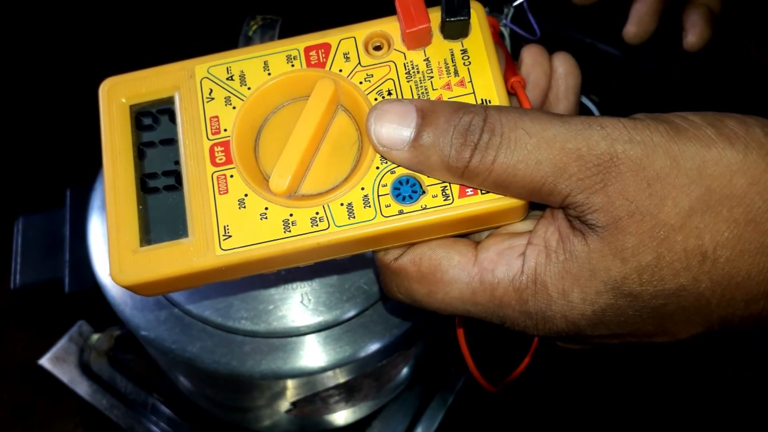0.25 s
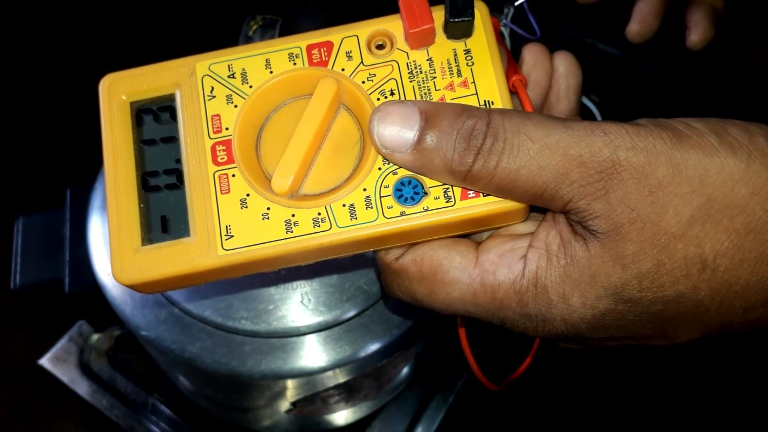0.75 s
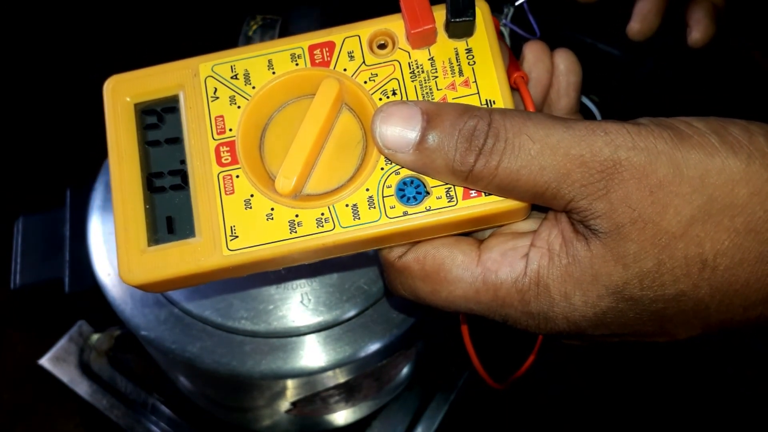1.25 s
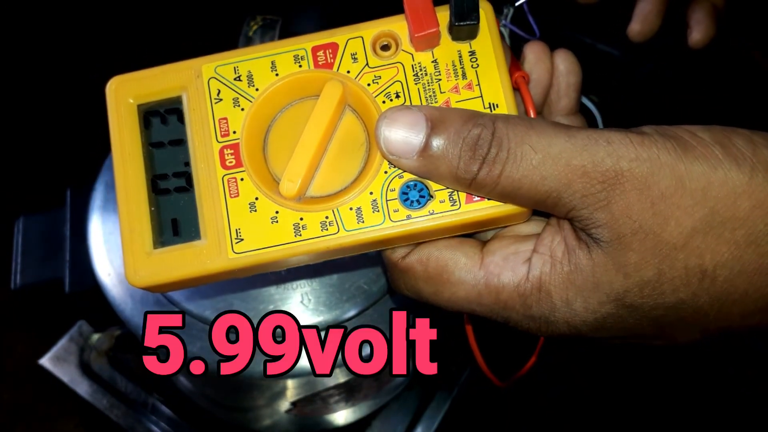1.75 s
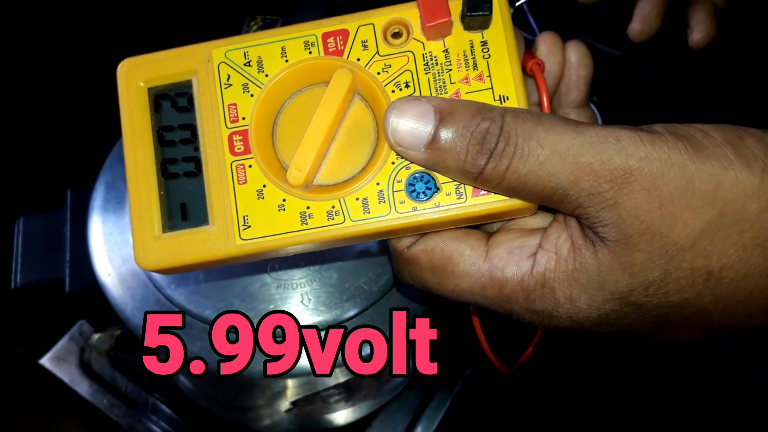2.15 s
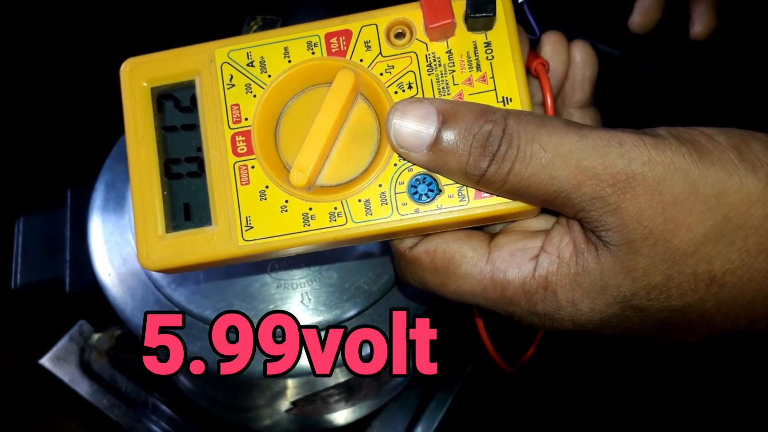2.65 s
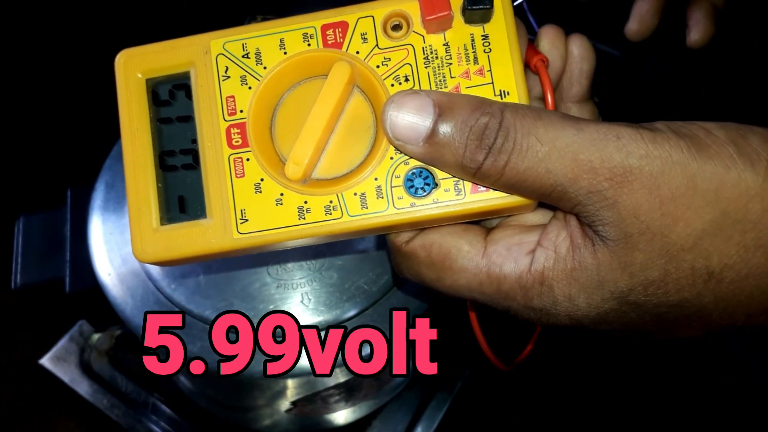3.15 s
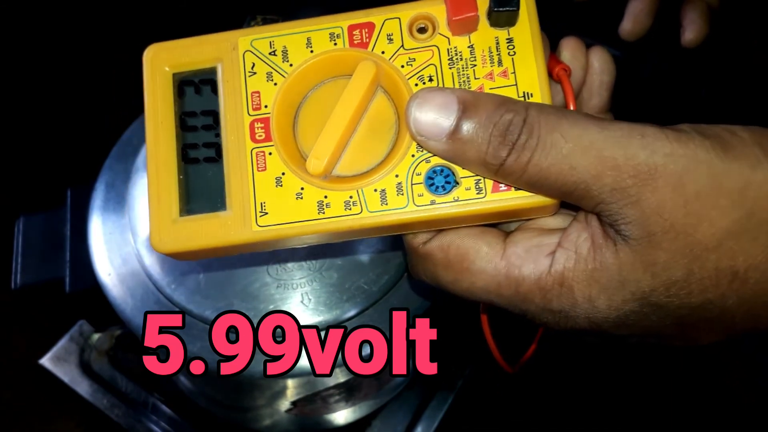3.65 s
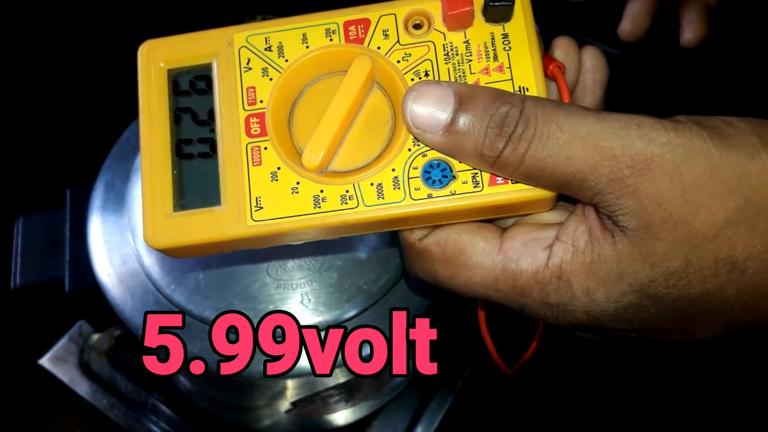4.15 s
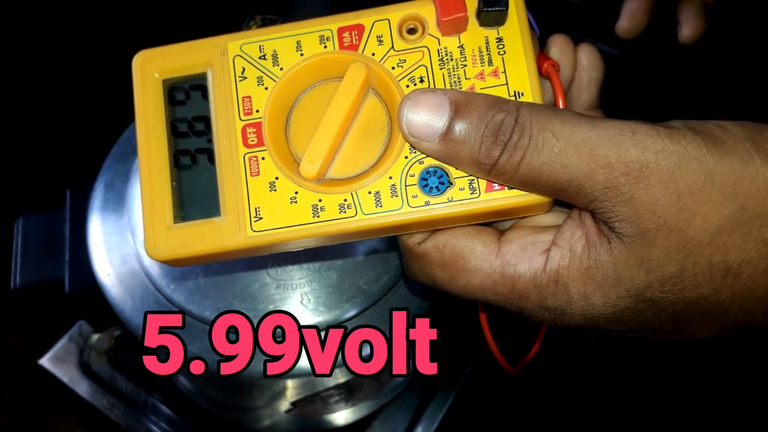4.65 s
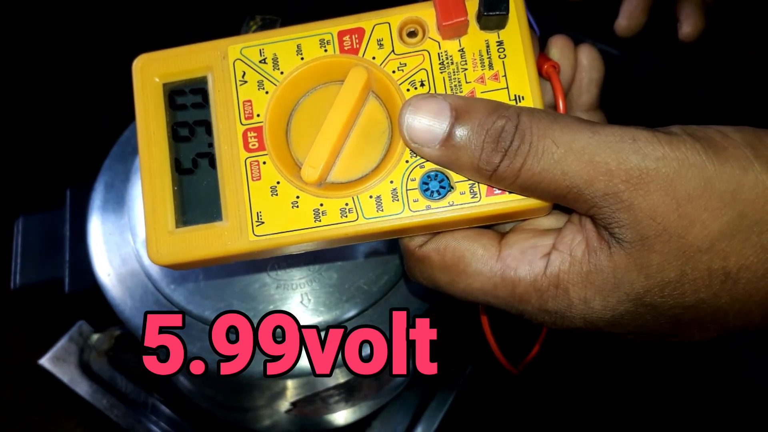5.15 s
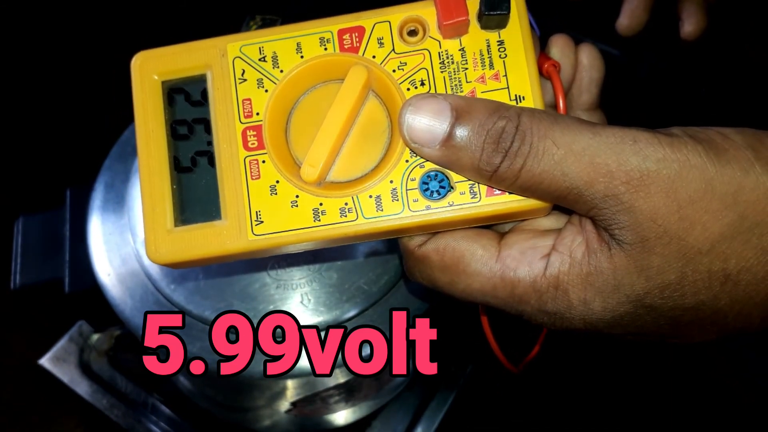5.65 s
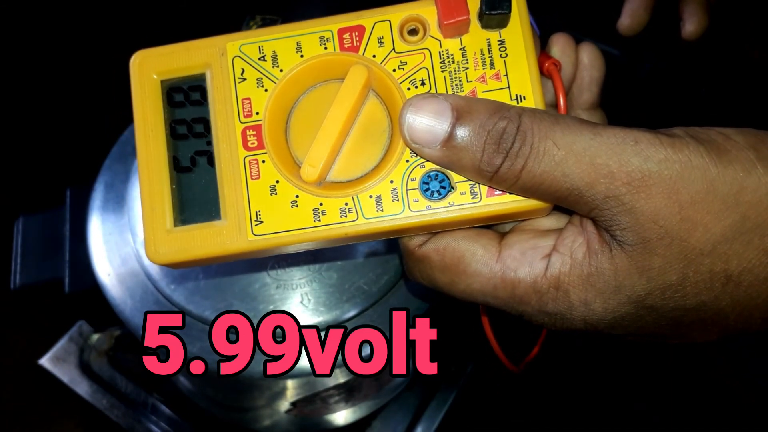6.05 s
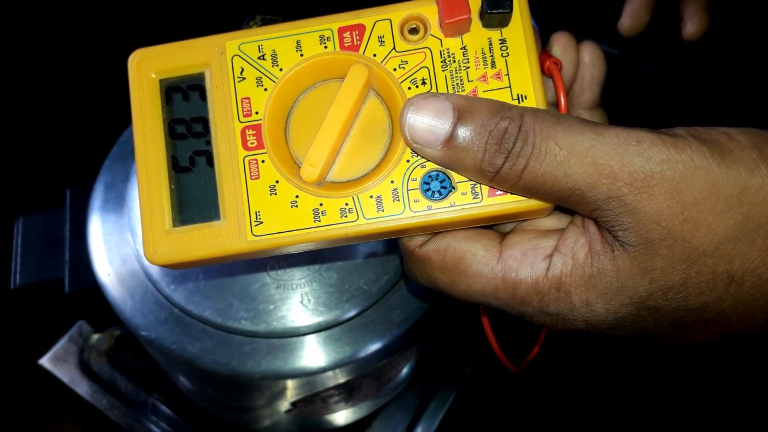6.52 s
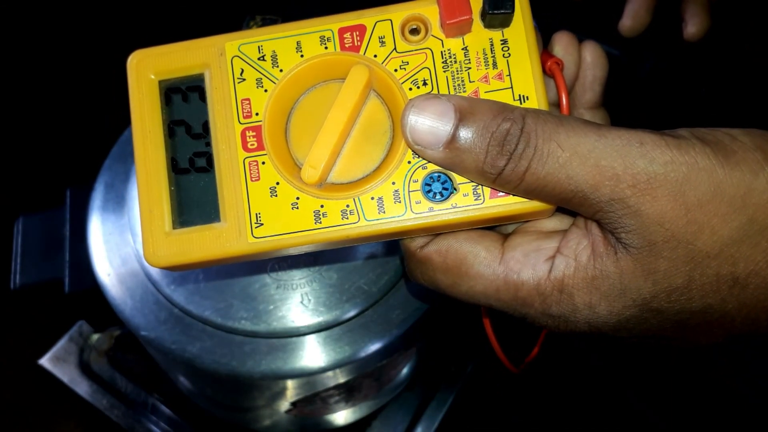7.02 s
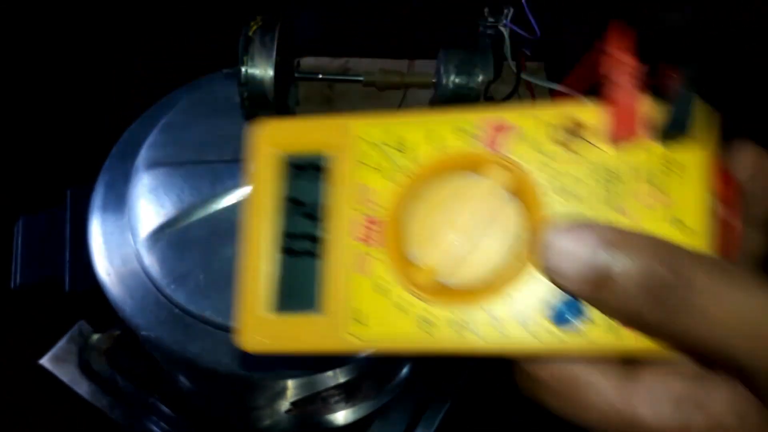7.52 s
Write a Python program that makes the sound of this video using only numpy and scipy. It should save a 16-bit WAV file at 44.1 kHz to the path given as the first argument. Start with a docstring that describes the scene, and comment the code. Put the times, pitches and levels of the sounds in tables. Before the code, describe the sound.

A small homemade steam engine runs steadily, with a wet, pulsing hiss over a fast metallic rattle and a faint hum.

```python
"""A wet, pulsing hiss over a rattle and a faint hum: a small homemade steam engine spins a little
generator, about 44 turns a second, on the lid of a pressure cooker. Steam leaves the valve in one puff
per turn, the loose crank and rod knock, and the shaft hums on its harmonics. Now and then a larger drop
spits. Hiss, rattle and spits ring through the wooden base, the metal parts and the valve cavity."""
import sys
import numpy as np
from scipy import signal
from scipy.fft import rfft, irfft
from scipy.io import wavfile

SR = 44100
rng = np.random.default_rng(int(sys.argv[2]) if len(sys.argv) > 2 else 0)


def to_wav(s):
    """Save 16-bit WAV."""
    ch = np.atleast_2d(s).T  # columns
    pcm = np.round(np.clip(ch, -1, 1) * 32767)  # PCM
    wavfile.write(sys.argv[1], SR, pcm.astype(np.int16))


N = 343092

# shaft speed: t/s, speed/(turns per s)
SHAFT_SPEED = [(0.0, 44.16), (0.9, 44.76), (1.42, 43.88), (1.63, 43.75), (2.2, 45.35), (2.35, 45.15),
               (2.74, 43.82), (3.05, 43.42), (3.56, 44.15), (4.1, 44.25), (4.43, 43.86), (5.55, 43.6),
               (5.94, 44.3), (6.36, 44.47), (6.63, 44.99), (7.15, 44.51), (7.42, 43.62), (7.78, 43.96)]
# swing of the steam flow, followed in part by each band of the hiss: t/s, level/dB
STEAM_FLOW = [(0.0, -0.7), (0.72, -0.1), (1.72, -0.6), (2.29, -1.3), (2.95, 2), (3.53, -1.1), (3.77, -0.5),
              (4.25, -2.8), (4.55, -2.5), (4.95, -0.4), (5.04, -1.5), (5.37, 1.5), (6.0, 0), (6.3, 0.2),
              (6.45, -1.7), (6.66, 0.5), (7.06, -2), (7.78, 3.5)]
# shape of one puff, before puff_depth scales it: position/turn, level/dB
PUFF_SHAPE = [(0, -1.6), (.38, -1.3), (.45, 1.1), (.57, 1.9), (.72, .6), (.88, .1), (1, -1.6)]
# tone of the steam jet: f/Hz, level/dB
JET_SPECTRUM = [(1200, -45.5), (2500, -21.5), (4500, -18.5), (8000, -19.5), (10000, -14), (12500, -18.5),
                (14500, -18), (15500, -22)]
# droplets ringing in the valve mouth: f/Hz, relative level/dB
DROPLET_PINGS = [(4200, -4), (5700, -1), (6900, -1), (8000, -1), (9100, 0), (9900, 0), (10700, 0),
                 (11700, 1), (12800, 1), (13800, 1), (14700, 1)]
# where play in the linkage is taken up: position/turn, relative level/dB
KNOCK_POINTS = [(.03, -2.5), (0.211, -3), (0.501, 0), (.8, -3)]
# tone of the rattle: f/Hz, level/dB
RATTLE_SPECTRUM = [(25, -60), (70, -46), (110, -39), (190, -41), (260, -27.5), (420, -31), (850, -31),
                   (1500, -25.5), (2400, -14), (3300, -23.5), (6000, -41)]
# hum of shaft and generator: multiple of shaft speed, level/dB, change/(dB per extra turn per s)
HUM_HARMONICS = [(2, -70, .4), (3, -64.5, -2), (5, -59.5, -2), (7, -56, -7), (8, -55, 2), (11, -58.5, -1),
                 (13, -62.5, 1), (14, -63.5, -4), (15, -54, 0), (16, -55.5, 3.7), (17, -60, 2.5),
                 (18, -61, .5), (21, -64, -2), (24, -56, 2), (25, -59.5, 3.7), (28, -60, 0),
                 (29, -59.5, -1), (32, -56, -1), (39, -54.5, -1), (59, -48.5, 1)]
# swell of the drone, the harmonic that sits on a resonance of the wooden base: t/s, level/dB
DRONE_SWELL = [(0, -18), (1.35, 10), (1.9, -8), (3.4, -8), (4.2, 10), (4.8, 2), (6.2, -2), (7.0, 6),
               (7.78, 4)]
# larger drops of condensate spat from the valve: t/s, relative level/dB
SPIT_HITS = [(2.0204, -2), (3.0074, -4), (3.029, 1.5), (3.599, -5), (6.104, -4), (7.7554, 0)]
# resonances (+) and antiresonances (-) of base, metal parts and valve cavity: f/Hz, width/Hz, level/dB
BASE_MODES = [(179, 17, 6), (223, 39, -4), (243.6, 10, 12), (264, 44, -2), (300, 11, 8.5), (461, 17, -6),
              (484.7, 12.7, 9.5), (594, 21, 3.5), (860, 140, -2.5), (1410, 24, 1)]
METAL_MODES = [(1628, 101, -2.9), (1735, 114, 2.2), (1852, 111, -5.9), (1978, 44, -4.2), (2131, 66, 2.9),
               (2202, 56, -5.1), (2275, 30, 3.6), (2328, 46, -3.8), (2383, 52, -5.0), (2471, 41, 4.9),
               (2519, 76, -8.2), (2604, 85, 4.3), (2679, 16, 4.2), (2706, 28, -4.1), (2733, 19, -8.7),
               (2784, 125, 2.7), (2888, 18, -5.5), (2966, 14, 5.2), (3078, 35, -6.2), (3127, 15, 6.4),
               (3169, 48, -5.1), (3452, 36, -2.8), (3557, 18, 3.4), (3599, 37, -3.3), (3762, 60, -2.9),
               (3854, 58, 5.1), (4005, 108, 2.9), (4167, 27, -4.8), (4242, 24, 5.2)]
CAVITY_MODES = [(4550, 115, -3.8), (4709, 49, -2.8), (5438, 39, -3.0), (5534, 50, 2.9), (5678, 496, 6.3),
                (6873, 468, 6.8), (7045, 51, 3.6), (8252, 59, -3.5), (9073, 471, 4.9), (10590, 490, 3.9),
                (12544, 48, 3.7), (13896, 402, 2.5)]


def steam_hiss(turns, flow_db, droplet_db=-6.5, puff_depth=0.87, hiss_db=-0.5):
    """A jet with fine droplets in it, let out once a turn and fluttering eight times a turn."""
    wetness = from_db(droplet_db)
    jet = (rng.standard_normal(N) + wetness * droplets()) / np.hypot(1, wetness)
    puff_db = puff_depth * np.interp(turns % 1, *np.transpose(PUFF_SHAPE))
    flutter_db = signal.sawtooth(2 * np.pi * 8 * turns, width=0)  # snaps open, closes slowly
    jet *= from_db(hiss_db + puff_db + flutter_db + 0.34 * drift(59))
    jet = engine_body(colour(jet, JET_SPECTRUM))
    # more flow lifts the sharp core of the hiss more than its lower part
    low, core = split(jet, hz=8000)
    jet = from_db(0.42 * flow_db) * low + from_db(0.88 * flow_db + 0.63 * drift(3.7)) * core
    # a faster jet also widens the core upwards
    edge = signal.lfilter(*signal.iirpeak(11300, Q=10, fs=SR), jet)
    jet += (from_db(0.63 * flow_db + 0.9 * drift(2.1)) - 1) * edge
    # the finest spray sits on top and flickers
    below, spray = split(jet, hz=12000)
    return below + from_db(0.6 * drift(5.5)) * spray


def droplets(width_hz=700, clump_db=2.0):
    """Fine droplets ping for about a millisecond at scattered pitches, swelling in clumps."""
    out = np.zeros(N)
    for hz, db in DROPLET_PINGS:
        clicks = grains(per_s=260, spread_db=1.0) * from_db(db + clump_db * drift(7.2))
        out += signal.lfilter(*signal.iirpeak(hz, hz / width_hz, fs=SR), clicks)
    return rms_one(out)


def linkage_rattle(turns, speed_offset, knock_db=-6.5, scrape_db=-2.0, scatter_turns=.035, uneven_db=3.0):
    """Loose joints knock four times a turn, never quite alike, while piston and bearings scrape."""
    # starts harder and settles, eases a little as the shaft speeds up, and wavers
    settling_db = 2.5 * np.exp(-np.arange(N) / (0.68 * SR))
    level_db = -0.22 + settling_db - 0.3 * speed_offset + .5 * drift(3.7)
    strikes = np.zeros(N)
    whole_turns = np.arange(int(turns[-1]))
    for position, contact_db in KNOCK_POINTS:
        late, strength = rng.standard_normal((len(whole_turns), 2)).T
        at = np.interp(whole_turns + position + scatter_turns * late, turns, np.arange(N)).astype(int)
        strikes[at] = from_db(contact_db + uneven_db * np.clip(strength, -2, 2))
    knocks = from_db(knock_db) * rms_one(bursts(strikes, decay_s=0.0014))
    scrape = from_db(scrape_db) * grains(per_s=10000, spread_db=2.0)
    return from_db(level_db) * engine_body(colour(knocks + scrape, RATTLE_SPECTRUM))


def shaft_hum(turns, speed_offset, trim_db=0.45, waver_db=2.0, drone_multiple=11):
    """Shaft harmonics swell and fade with speed, as if sliding on and off resonances."""
    drone_db = in_time(DRONE_SWELL)
    whine_db = 1.45 * drift(2)  # the whine above the drone wavers as one
    out = np.zeros(N)
    for multiple, db, db_per_speed in HUM_HARMONICS:
        phase = 2 * np.pi * (multiple * turns + rng.random()) + .2 * drift(3)
        tuning_db = np.minimum(db_per_speed * speed_offset, 5)
        swell_db = drone_db * (multiple == drone_multiple) + whine_db * (multiple > drone_multiple)
        level_db = trim_db + db + tuning_db + swell_db + waver_db * drift(3.4)
        out += np.sqrt(2) * from_db(level_db) * np.sin(phase)
    return out


def spits(trim_db=4.0):
    """Larger drops burst at the valve mouth, each a sharp tick of hiss."""
    strikes = np.zeros(N)
    for s, db in SPIT_HITS:
        strikes[round(s * SR)] = from_db(db + trim_db)
    return engine_body(colour(bursts(strikes, decay_s=0.0015), JET_SPECTRUM))


def engine_body(x):
    """Wood, metal and cavity: each resonance lifts, and each antiresonance hollows, a narrow band."""
    sections = []
    for hz, width_hz, db in [*BASE_MODES, *METAL_MODES, *CAVITY_MODES]:
        b, a = signal.iirpeak(hz, hz / width_hz, fs=SR)
        sections.append(np.r_[a + (from_db(db) - 1) * b, a])
    return signal.sosfilt(np.array(sections), x + 1e-18)


def reflections(x, echo_db=-9.5, count=16, delay_s=(.005, .03)):
    """Lid, table and walls send back early echoes that comb the hiss finely."""
    echoes = np.zeros(N)
    for lag in (rng.uniform(*delay_s, count) * SR).astype(int):
        echoes[lag:] += rng.choice([-1, 1]) * x[:-lag] / np.sqrt(count)
    return (x + from_db(echo_db) * echoes) / np.hypot(1, from_db(echo_db))


def grains(per_s, spread_db):
    """Crackle: clicks at random moments, of uneven size and either sign; rms 1."""
    sizes = from_db(spread_db * np.minimum(rng.exponential(1, N), 3))
    signs = rng.choice([-1, 1], N)
    return rms_one(sizes * signs * (rng.random(N) < per_s / SR))


def bursts(strikes, decay_s):
    """Each strike triggers a burst of noise that dies away."""
    power = signal.lfilter([1], [1, -np.exp(-2 / (decay_s * SR))], strikes ** 2 + 1e-18)
    return np.sqrt(power) * rng.standard_normal(N)


def drift(rate, hop=40, warm_up=2000):
    """Smooth random wobble of spread 1, changing about rate times a second."""
    pole = np.exp(-2 * np.pi * rate * hop / SR)
    noise = rng.standard_normal(N // hop + warm_up + 2)
    slow = signal.lfilter([1], [1, -2 * pole, pole * pole], noise)[warm_up:]
    return np.interp(np.arange(N) / hop, np.arange(len(slow)), rms_one(slow))


def colour(x, spectrum, size=8192):
    """Minimum-phase EQ along the given spectrum, rolling off below its first point."""
    hz = np.maximum(np.fft.rfftfreq(size, 1 / SR), 1)
    points_hz, db = np.transpose(spectrum)
    roll_off = np.clip(hz / points_hz[0], .05, 1) ** 2
    gain = from_db(np.interp(np.log(hz), np.log(points_hz), db)) * roll_off
    cepstrum = irfft(np.log(gain))[:size // 2]
    causal = np.r_[cepstrum[0], 2 * cepstrum[1:]]
    response = irfft(np.exp(rfft(causal, size)))
    return signal.fftconvolve(x, response)[:N]


def split(x, hz):
    """Crossover into lows and highs whose sum keeps the level."""
    filters = [signal.butter(4, hz, kind, fs=SR, output="sos") for kind in ("low", "high")]
    return [signal.sosfilt(np.tile(sos, (2, 1)), x) for sos in filters]


def in_time(curve):
    """An automation curve's value at every sample."""
    return np.interp(np.arange(N) / SR, *np.transpose(curve))


def from_db(db):
    """Decibels to gain."""
    return 10 ** (np.asarray(db) / 20)


def rms_one(x):
    """Scale to rms 1."""
    return x / np.sqrt(np.mean(x ** 2) + 1e-20)


def scene():
    """One shaft angle drives valve, linkage and hum; the steam flow rides the level of the hiss."""
    speed = in_time(SHAFT_SPEED)
    speed_offset = speed - speed.mean()
    turns = np.cumsum(speed) / SR
    exhaust = reflections(steam_hiss(turns, in_time(STEAM_FLOW)) + spits())
    return (exhaust + linkage_rattle(turns, speed_offset) + shaft_hum(turns, speed_offset))[None]


def record(dry):
    """A steep high cut takes the very top off the hiss."""
    cutoff_hz = 15480
    return signal.sosfilt(signal.ellip(12, .1, 90, cutoff_hz, fs=SR, output="sos"), dry)


dry = scene()
out = record(dry)
to_wav(out)
```